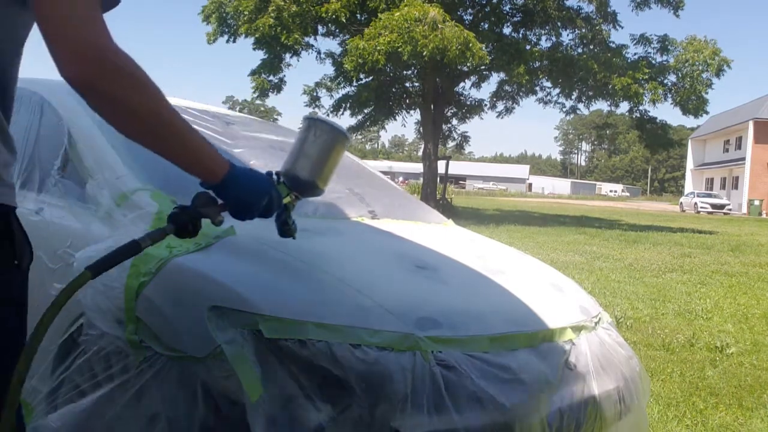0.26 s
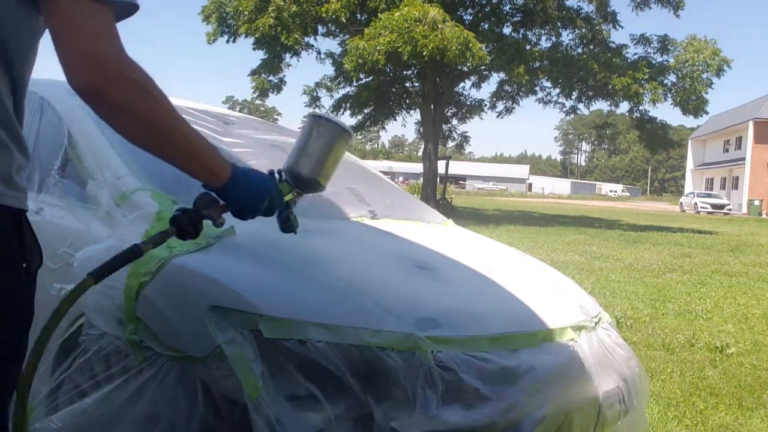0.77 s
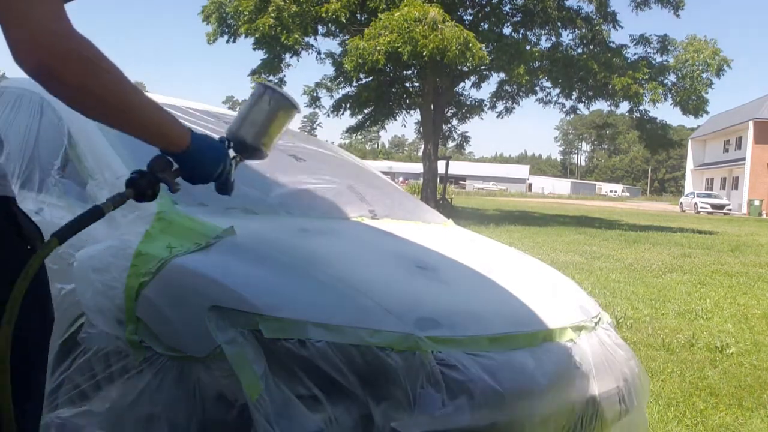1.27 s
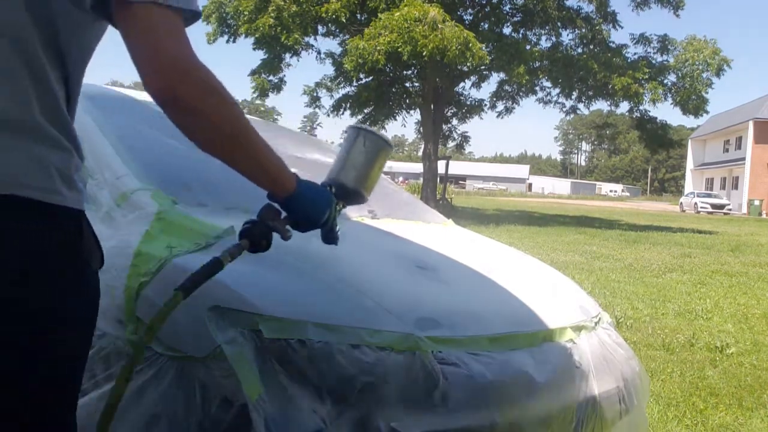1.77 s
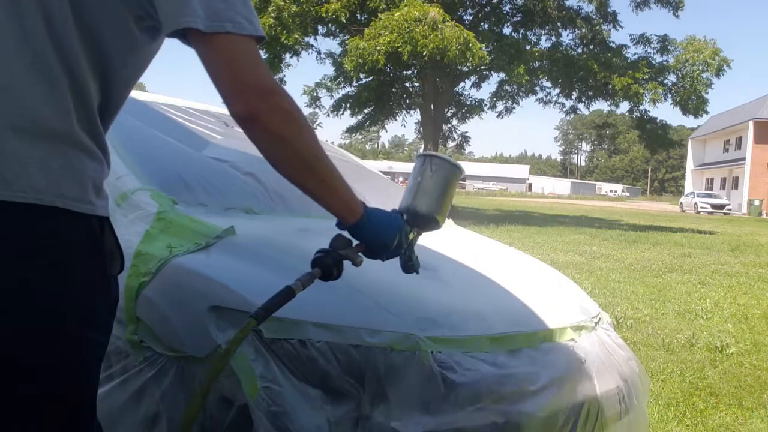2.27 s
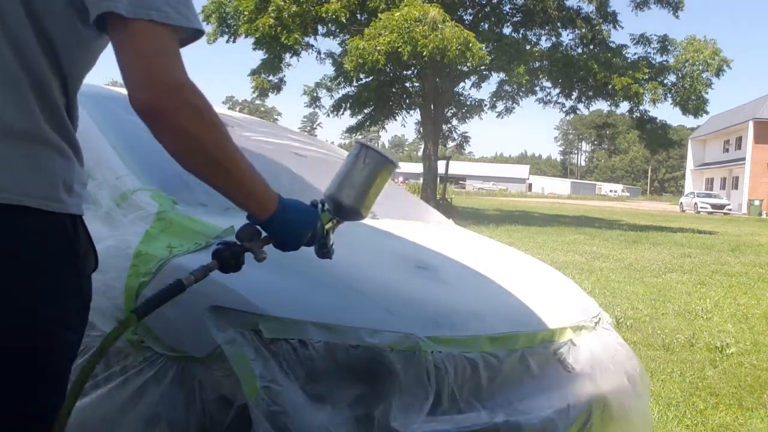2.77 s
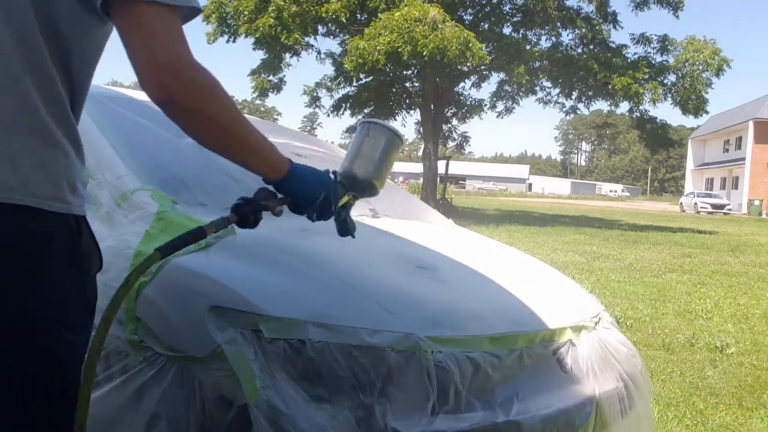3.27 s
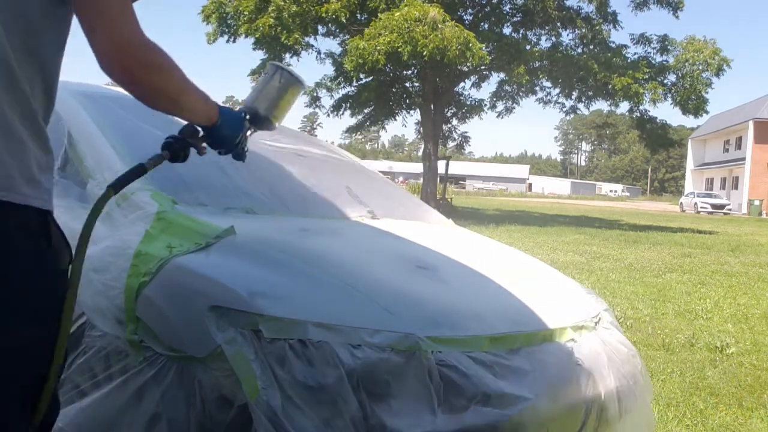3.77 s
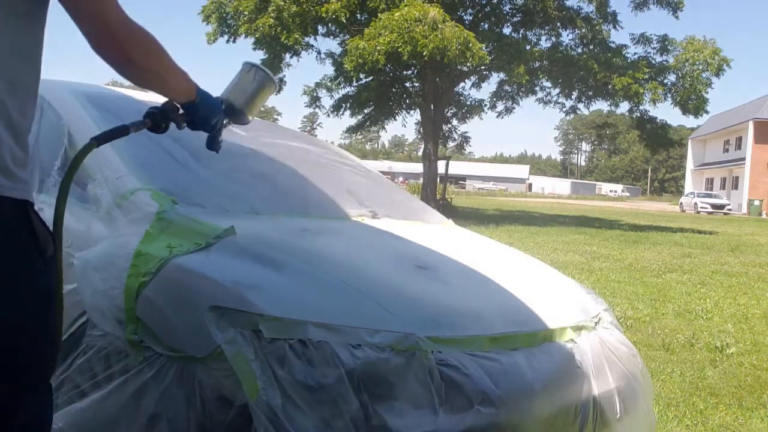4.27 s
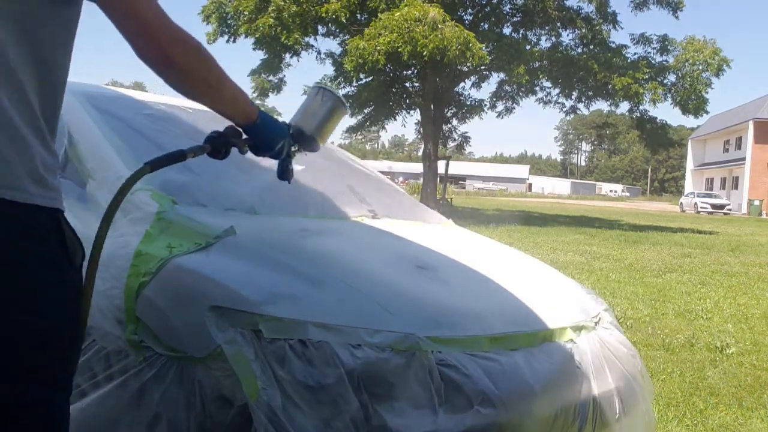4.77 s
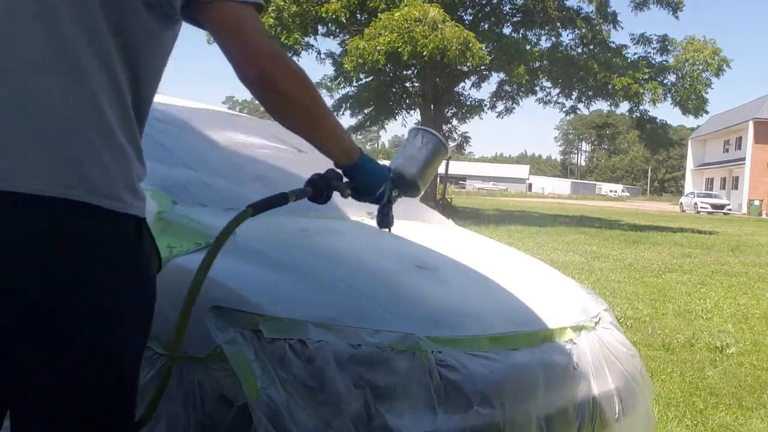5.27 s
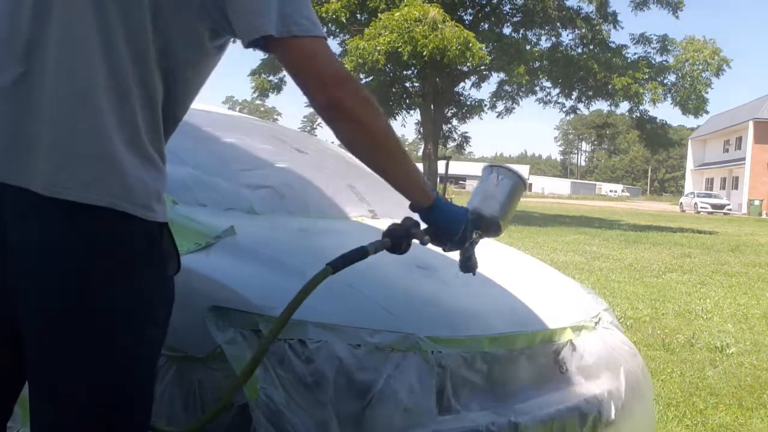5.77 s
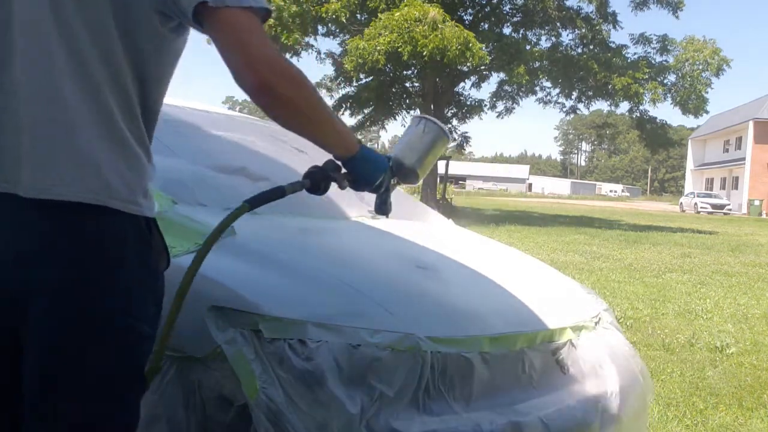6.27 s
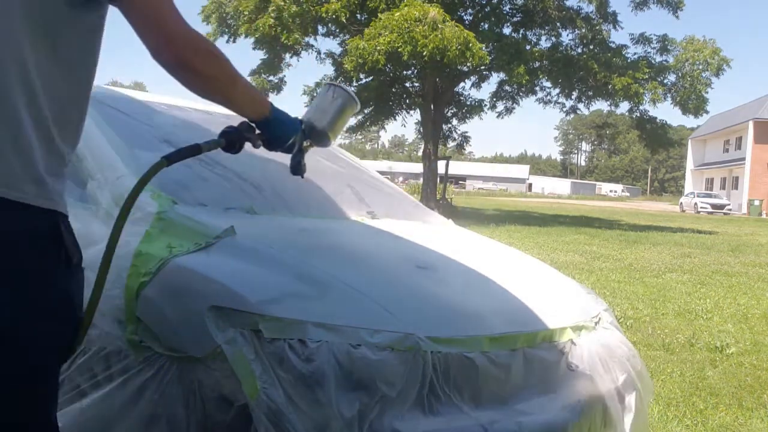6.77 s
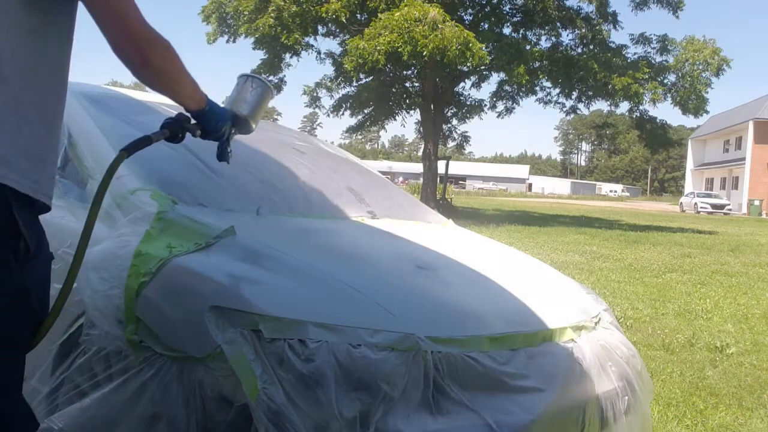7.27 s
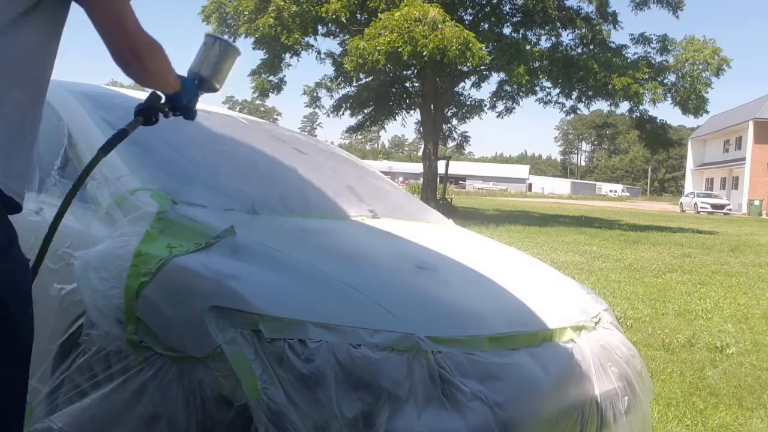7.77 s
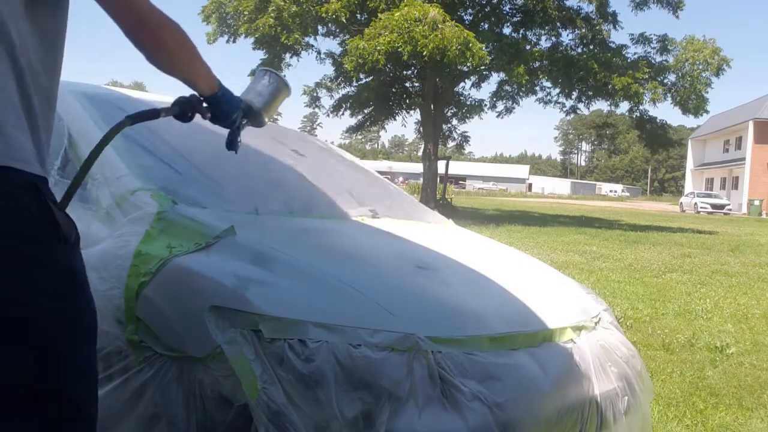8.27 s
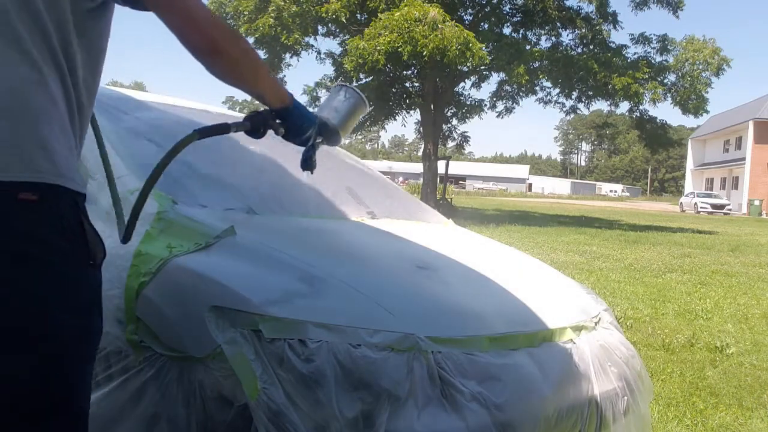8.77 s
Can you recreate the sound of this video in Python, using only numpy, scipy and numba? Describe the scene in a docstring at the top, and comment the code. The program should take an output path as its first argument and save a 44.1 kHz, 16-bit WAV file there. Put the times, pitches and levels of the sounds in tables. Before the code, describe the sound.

A compressed-air spray gun hisses brightly in three long outdoor passes, cutting twice to a thin leak, over a faint distant motor hum.

```python
"""Outdoors, a compressed-air spray gun lays primer on a masked car about a metre from two microphone ports.
Coloured noise hisses as the jet through three passes, with a burst of overshoot at each trigger pull;
between them a thin, high-pitched leak of air goes on, and low decaying swings thump as the air jolts.
Moving delays and gliding bands make the echoes off panels and masking film sweep with the arm.
Wavering low sines in a rumble hum as a motor far off."""
import sys
import numpy as np
from scipy import signal
from scipy.fft import rfft, irfft, next_fast_len
from scipy.io import wavfile
from scipy.ndimage import uniform_filter1d
from numba import njit

SR = 44100
rng = np.random.default_rng(int(sys.argv[2]) if len(sys.argv) > 2 else 0)


def dump(signal):
    """Clip the signal to [-1, 1] and save it as 16-bit WAV at the path in sys.argv[1]."""
    limited = np.clip(np.atleast_2d(signal).T, -1, 1)
    pcm = np.round(limited * 32767).astype(np.int16)
    wavfile.write(sys.argv[1], SR, pcm)


N = 397782
T = np.arange(N) / SR
OVERSAMPLE = 8  # resampling factor for moving delays

# trigger let go and pulled again: (let go [s], pulled [s], overshoot of stored hose pressure [dB],
# share of the flow that drains slowly [0-1])
TRIGGER_PAUSES = [(3.602, 3.976, 9, .1), (7.653, 8.070, 10, .14)]
# spectrum of low air buffeting and thump eddies: (frequency [Hz], level [dB])
BUFFET_SPECTRUM = [(30, -16), (65, -15), (130, -2.5), (200, -6.5), (330, -6), (500, -13.5), (900, -21)]


def undb(db):
    """Decibels to gain."""
    return 10 ** (np.asarray(db) / 20)


def curve(rows):
    """Join (time, value) points by straight lines."""
    times, values = np.transpose(rows)
    return np.interp(T, times, values)


def unit(x):
    """Scale so that the mean of the channels has rms 1."""
    return x / np.std(np.atleast_2d(x).mean(axis=0))


def colour(x, points):
    """Filter by a spectrum of (Hz, dB) points, joined along log frequency."""
    hz, db = np.transpose(points)
    size = next_fast_len(N, True)
    bins = np.maximum(np.fft.rfftfreq(size, 1 / SR), 1)
    gain = undb(np.interp(np.log(bins), np.log(hz), db))
    return irfft(rfft(x, size) * gain, size)[..., :N]


def split(x, hz):
    """The parts below and above a crossover."""
    low = signal.sosfiltfilt(signal.butter(5, hz, fs=SR, output="sos"), x)
    return low, x - low


def walk(rate):
    """Random levels, one every 1 / rate seconds, slewed into each other; spread 1."""
    hold = max(int(SR / rate), 1)
    steps = np.repeat(rng.standard_normal(N // hold + 1), hold)
    return unit(uniform_filter1d(steps, hold)[:N])


def swells(rows):
    """Bell-shaped changes of level in dB; one curve for each column after time and half length."""
    centre_s, half_s, *columns = np.transpose(rows)
    bells = np.exp(-((T - centre_s[:, None]) / half_s[:, None]) ** 2)
    return np.array(columns) @ bells


def low_noise():
    """Noise that is mostly the same at both ports, as long waves are."""
    return rng.standard_normal(N) + .34 * rng.standard_normal((2, N))


def finely(x):
    """A finely resampled copy, for reading at moving delays."""
    return signal.resample_poly(x, up=OVERSAMPLE, down=1)


def delayed(fine, ms):
    """The sound after a path whose length may move, read from a finely resampled copy."""
    where = (np.arange(N) - ms * SR / 1000) * OVERSAMPLE
    return fine.take(np.rint(where).astype(int), mode="wrap")


def at_height(lift, values):
    """Blend the values for the nozzle down, halfway and up."""
    return np.interp(lift, [0, .5, 1], values)


@njit
def band(x, hz, width):
    """State-variable band-pass with a moving centre, gain 1 there."""
    y, band_state, low_state = np.empty(len(x)), 0., 0.
    for i in range(len(x)):
        g, damping = np.tan(np.pi * hz[i] / SR), width / hz[i]
        v = (band_state + g * (x[i] - low_state)) / (1 + g * (g + damping))
        band_state = 2 * v - band_state
        low_state += 2 * g * v
        y[i] = damping * v
    return y


def film(air, lift, count=10):
    """Wrinkles of masking film scatter short echoes that glide with lift and swell and fade at random."""
    near_ms, depth_ms, sweep_ms = 1.0, 6.0, .9  # nearest path, spread, largest glide over the full lift
    glints_per_s = 2.2
    hand_wobble = .035  # rms unsteadiness, as a share of the full lift
    # echo strength: (gain with the nozzle down, gain with it up)
    wrinkle_gains = (.11, .2)
    # wrinkles are too small to throw back long waves: (frequency [Hz], level [dB])
    wrinkle_spectrum = [(500, -7), (1500, -1), (3500, .5), (8000, .5), (14000, -2)]
    echoes = np.zeros(N)
    reach = lift - .5 + hand_wobble * walk(3)
    for far, sweep in rng.uniform(-1, 1, (count, 2)):
        path_ms = near_ms + depth_ms * far ** 2 + sweep_ms * sweep * reach
        echoes += walk(glints_per_s) * delayed(air, path_ms)
    return colour(echoes * np.interp(lift, [0, 1], wrinkle_gains), wrinkle_spectrum)


def turbulence(swing, lift):
    """Air noise as it reaches the two ports: direct, off the panels, and scattered by crumpled film."""
    # noise that differs from port to port, as the air fan is wide: (frequency [Hz], level [dB])
    diffuse_spectrum = [(300, 0), (600, 2.5), (1100, 2), (2500, -2.5), (10000, 0), (16000, 2)]
    # bonnet and windscreen: (delay at lift 0 [ms], at half lift [ms], at lift 1 [ms],
    # left gain, right gain), before the change with height below
    panel_paths = [(1.25, 1.11, .97, .5, .08), (.72, .705, .62, .1, .4), (.6, .56, .45, .22, .08)]
    # long waves bend round the panel and wrinkled masking scatters the treble: (frequency [Hz], level [dB])
    panel_spectrum = [(700, -9), (1500, 0), (6000, 0), (12000, -6)]
    # farther reflections: (delay at swing 0 [ms], delay at swing 1 [ms], left gain, right gain)
    far_paths = [(1.917, 2.192, -0.038, 0.18), (2.5, 2.767, 0.1, 0.046)]
    # bands of the hiss that move with the nozzle: (centre at lift 0 [Hz], at half lift [Hz],
    # at lift 1 [Hz], width [Hz], left gain, right gain)
    hiss_bands = [(1640, 1580, 2300, 310, 0.99, 0.78), (2490, 2855, 3000, 490, 0.71, 0.65),
                  (3620, 4070, 4770, 340, 0.73, 1.1), (5480, 4800, 4700, 390, 0, 0.07),
                  (8650, 8450, 9500, 320, 0.35, 0.34), (12000, 12100, 12750, 2900, 0, 0.96)]
    # the right port's colour against the left: (frequency [Hz], level [dB])
    right_port_spectrum = [(300, 0), (700, -3), (1600, 0), (3300, -1.3), (4000, 1.5), (6000, 1.5),
                           (7700, -2.2), (9000, .3), (10700, 1.5), (12300, 4), (13300, 3), (14500, 2),
                           (15650, 9.7)]
    # the sloping glass throws back more than the bonnet: -17 dB low, -8.5 dB high
    panel_db = -8.5 * (2.0 - lift)
    noises = rng.standard_normal(N) + colour(rng.standard_normal((2, N)), diffuse_spectrum)
    ports = []
    # the left port hears the gun up to .125 ms later with the arm drawn back
    for side, lag_ms in enumerate([.125 * swing, 0]):
        air = finely(noises[side])
        # moving echoes comb the hiss, so its colour glides with the arm
        panel = np.zeros(N)
        for low_ms, mid_ms, top_ms, *gains in panel_paths:
            path_ms = lag_ms + at_height(lift, [low_ms, mid_ms, top_ms])
            panel += gains[side] * delayed(air, path_ms)
        port = delayed(air, lag_ms) + colour(panel, panel_spectrum) * undb(panel_db) + film(air, lift)
        for out_ms, back_ms, *gains in far_paths:
            port += gains[side] * delayed(air, lag_ms + out_ms + (back_ms - out_ms) * swing)
        resonance = np.zeros(N)
        for low_hz, mid_hz, top_hz, width_hz, *gains in hiss_bands:
            centre_hz = at_height(lift, [low_hz, mid_hz, top_hz])
            resonance += gains[side] * band(port, centre_hz, float(width_hz))
        ports.append(port + resonance)
    return np.array([ports[0], colour(ports[1], right_port_spectrum)])


def valve():
    """Air flow 0-1 and its overshoot: the head drains after closing, stored pressure spits on opening."""
    open_s, spit_s, close_s, drain_s = .011, .009, .0055, .1  # opening time, then three decay times
    flow, spit = np.ones(N), np.ones(N)
    for closes, opens, overshoot_db, drain_share in TRIGGER_PAUSES:
        after, since = np.maximum(T - closes, 0), np.maximum(T - opens, 0)
        fall = (1 - drain_share) * np.exp(-after / close_s) + drain_share * np.exp(-after / drain_s)
        rise = np.minimum(since / open_s, 1) ** 2
        flow *= np.maximum(fall, rise)
        sag = np.exp(-np.maximum(since - open_s, 0) / spit_s)
        spit += (since > 0) * (undb(overshoot_db) - 1) * sag
    return flow, spit


def passes():
    """The levels of each pass, held while it lasts and changed during the pauses."""
    # base levels of the three passes, arm fully out:
    # (atomising sizzle [dB], air rush [dB], wash on the panel [dB])
    pass_levels = [(-22, -37, -45), (-21.5, -37.5, -45), (-21.5, -36, -44.5)]
    edges = np.array(TRIGGER_PAUSES)[:, :2].ravel()
    return [np.interp(T, edges, np.repeat(column, 2)[1:-1]) for column in np.transpose(pass_levels)]


def surge():
    """Hose pressure built up in a pause lifts the sizzle by 3.5 dB at each pull, then sags."""
    surge_db, sag_s = 3.5, 0.57
    lift_db = np.zeros(N)
    for _, opens, *_ in TRIGGER_PAUSES:
        lift_db += surge_db * (T > opens) * np.exp(-np.maximum(T - opens, 0) / sag_s)
    return lift_db


def spray(air, flow, spit, swing, sputter_db=0.55, flutter_db=0.5, rush_flutter_db=0.99,
          wash_flutter_db=1.0, eddy_db=1.0):
    """Paint tears into mist at the nozzle, the jet rushes behind it and washes over the panel."""
    # spectrum of the jet: (frequency [Hz], level [dB])
    jet_spectrum = [(150, -45), (450, -19), (800, -14), (1250, -11), (1600, -10), (2150, -7), (2800, -1.5),
                    (3400, -2.5), (4000, -4), (5600, 2), (7500, 0), (9000, 4), (12000, 6.5)]
    # brief spurts: (time [s], half length [s], change of sizzle [dB], change of rush [dB])
    jet_spurts = [(.185, 0.017, 0, 1.5), (.255, 0.05, 1, 0.5), (.455, 0.016, -2, 2), (.51, 0.05, 1.5, 0),
                  (.555, 0.0095, -2, 4.5), (1.24, .035, 3.5, -1), (2.33, 0.037, 2, -0.5),
                  (2.395, 0.0058, 0, 4), (2.89, 0.0091, 4, 4.5), (3.216, 0.0093, -1, 4.5),
                  (3.275, 0.041, 2.5, 1), (3.58, 0.013, 2, 2), (4.98, 0.11, -1, 0.7), (5.7, 0.013, -2, 2.5),
                  (5.78, 0.012, 2.5, 0.5), (6.53, 0.048, -1, 1.5), (7.2, 0.096, 2, 0), (7.61, 0.0064, 4, 6)]
    # the sizzle thins for a moment: (time [s], half length [s], change [dB])
    sizzle_lulls = [(.95, .12, -0.5), (3.07, 0.034, -1.5), (5.27, 0.15, -2), (6.9, 0.18, -0.5)]
    # the fan blows towards the ports: (time [s], half length [s], rise of the buffeting [dB])
    fan_gusts = [(.9, 0.028, 12), (1.45, .05, 9), (7.58, 0.21, 10.5), (8.2, 0.25, 8.5)]
    # the jet turns away as the arm draws fully back
    back_sizzle_db, back_rush_db, back_wash_db, back_buffet_db = -7, -2.5, -3.5, -3.5
    back_pan_db = -2.5  # left minus right, as the hand shades the left port
    buffet_db = -58  # low buffeting of the air fan on the car, arm out
    sizzle_db, rush_db, wash_db = passes()
    sizzle_spurt, rush_spurt = swells(jet_spurts)
    sizzle_level = sizzle_db + back_sizzle_db * swing + sizzle_spurt + swells(sizzle_lulls)[0] + surge()
    rush_level = rush_db + back_rush_db * swing + rush_spurt
    wash_level = wash_db + back_wash_db * swing + .5 * rush_spurt
    buffet_level = buffet_db + back_buffet_db * swing + swells(fan_gusts)[0]
    wash, upper = split(colour(air, jet_spectrum), 2700)
    rush, sizzle = split(upper, 8500)
    # uneven paint feed makes the hiss sputter
    sputter = sputter_db * walk(22) + flutter_db * walk(90)
    # the gun body and hand shade the ports differently as they move
    shade = np.outer([.7, -.3], back_pan_db * (swing - swing.mean()))
    # the spit is strongest in the sizzle and weakest in the wash
    nozzle = unit(sizzle) * spit * undb(sizzle_level + shade)
    nozzle += unit(rush) * spit ** .6 * undb(rush_level + rush_flutter_db * walk(60))
    panel = unit(wash) * spit ** .3 * undb(wash_level + wash_flutter_db * walk(35))
    buffet = unit(colour(low_noise(), BUFFET_SPECTRUM)) * undb(buffet_level + eddy_db * walk(25))
    return flow * (nozzle * undb(sputter) + panel + buffet)


def motor(rumble_db=-58, waver_db=-1.0, drift_rad=0.56):
    """A far motor: low tones, wavering in level and phase, in a rumble."""
    # steady tones: (frequency [Hz], rms level before wavering [dB])
    motor_tones = [(44, -70), (60, -68), (88, -66.5), (98, -66.5)]
    # spectrum of the rumble: (frequency [Hz], level [dB])
    rumble_spectrum = [(20, -16), (32, -16), (42, 1.5), (60, 6.5), (75, 1.5), (95, 6), (140, -4.5),
                       (200, -12), (400, -24.5), (1000, -38), (4000, -57)]
    tones = np.zeros(N)
    for hz, db in motor_tones:
        peak = np.sqrt(2) * undb(db + waver_db * walk(2.124))
        tones += peak * np.sin(2 * np.pi * hz * T + drift_rad * walk(2.8))
    return unit(colour(low_noise(), rumble_spectrum)) * undb(rumble_db) + tones


def thumps():
    """Each jolt of the air stream gives a short low swing of pressure with eddies on it."""
    # flow starts, stops or gusts: (time [s], level before rise and decay [dB], decay [s],
    # pitch [Hz], eddy rms against the swing's peak [ratio])
    air_jolts = [(1.458, -45.5, 0.16, 59.7, 0.37), (3.604, -35.5, 0.012, 90, 0.73),
                 (3.984, -44, 0.037, 62.5, .4), (7.658, -34.5, 0.018, 96, 0.58),
                 (8.091, -40, 0.024, 60, 0.35)]
    rise_s = .0015
    eddies = unit(colour(rng.standard_normal(N), BUFFET_SPECTRUM))
    out = np.zeros(N)
    for start_s, db, decay_s, ring_hz, eddy_share in air_jolts:
        age = np.maximum(T - start_s, 0)
        envelope = undb(db) * (1 - np.exp(-age / rise_s)) * np.exp(-age / decay_s)
        out += envelope * (np.sin(2 * np.pi * ring_hz * age) + eddy_share * eddies)
    return out


def leak(air, flow, lift, left_db=-2, waver_db=1.0):
    """A thin high hiss from the air cap with the paint shut off; its comb slides up as the gun rises."""
    # spectrum of the leak: (frequency [Hz], level [dB])
    leak_spectrum = [(500, -32), (1450, -26), (2300, -10), (3000, -13.5), (3900, -18), (5200, -8),
                     (7700, -6.5), (9400, 2), (11300, 5), (12800, 8.5), (14200, 1), (15600, 3)]
    # the leak swells as the air cap turns: (time [s], half length [s], rise [dB])
    cap_swells = [(3.86, 0.11, 6.5)]
    # echo off the gun and hand: (delay at lift 0 [ms], delay at lift 1 [ms], gain)
    gun_echo = (.765, .603, .37)
    # only short waves bounce off something as small as the gun: (frequency [Hz], level [dB])
    gun_echo_spectrum = [(3300, -22), (4800, -4), (9000, 0)]
    level = -40 + swells(cap_swells)[0]
    low_ms, top_ms, gain = gun_echo
    path_ms = low_ms + (top_ms - low_ms) * lift
    echo = np.array([delayed(finely(port), path_ms) for port in air])
    left, right = colour(air + gain * colour(echo, gun_echo_spectrum), leak_spectrum)
    hiss = unit(np.array([undb(left_db) * left, right]))
    return hiss * undb(level + waver_db * walk(120)) * np.clip(1 - flow, 0, 1)


def scene():
    """The arm sweeps and raises the gun while the trigger switches between spray and leak."""
    # (time [s], swing [0 = out over the bonnet, 1 = drawn back to the windscreen])
    arm_swing = [(0, 0.41), (.52, 0.16), (1.15, 0.76), (1.42, 0.7), (1.8, 0.27), (2.35, 0.13), (2.98, 0.4),
                 (3.28, 0.14), (3.6, 0.43), (3.9, 0.84), (4.35, 0.66), (4.95, 0.19), (5.7, 0.13),
                 (6.2, 0.25), (6.7, 0.23), (7.15, 0.7), (7.8, 0.78), (9.02, 0.33)]
    # (time [s], nozzle height [0 = down on the bonnet, 1 = top of the windscreen])
    nozzle_lift = [(0, 0.66), (.5, 0.26), (1.2, 0.7), (2.25, 0.12), (3.0, 0.38), (3.35, 0.24), (3.68, 0.64),
                   (3.9, 0.87), (4.45, 0.73), (4.999, 0.55), (5.75, 0.084), (6.25, 0.32), (6.65, .58),
                   (7.1, 0.82), (7.9, 0.94), (8.25, 0.78), (8.6, 0.76), (9.02, 0.5)]
    # round the corners of the movement over a sixth of a second
    swing = uniform_filter1d(curve(arm_swing), size=SR // 6)
    lift = uniform_filter1d(curve(nozzle_lift), size=SR // 6)
    flow, spit = valve()
    air = turbulence(swing, lift)
    return spray(air, flow, spit, swing) + motor() + thumps() + leak(air, flow, lift)


def record(dry):
    """An elliptic low-pass cuts the top steeply above 15.72 kHz."""
    return signal.sosfilt(signal.ellip(12, .2, 80, 15720, fs=SR, output="sos"), dry)


dry = scene()
out = record(dry)
dump(out)
```